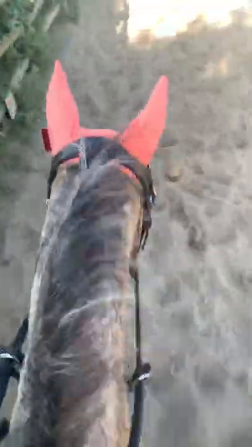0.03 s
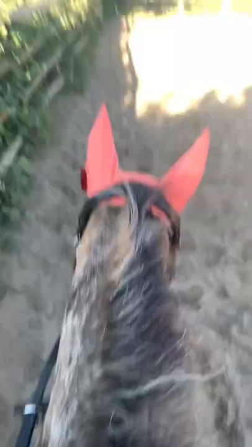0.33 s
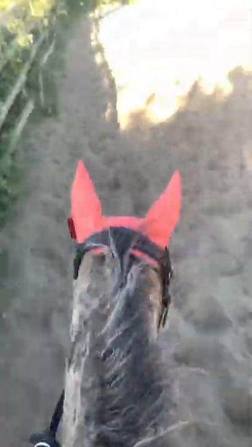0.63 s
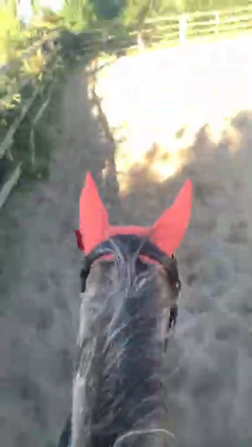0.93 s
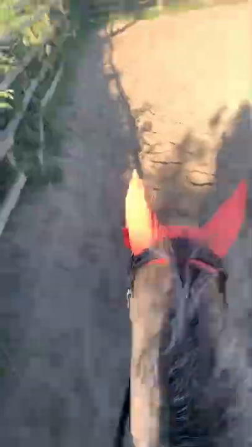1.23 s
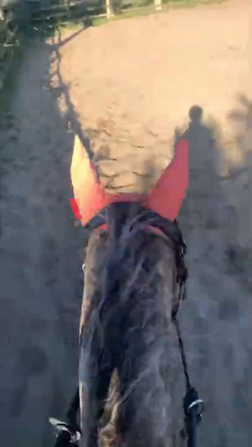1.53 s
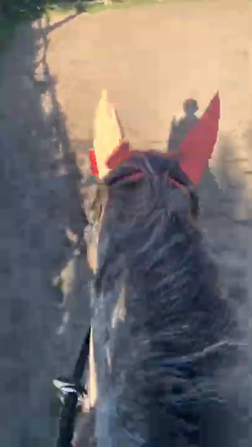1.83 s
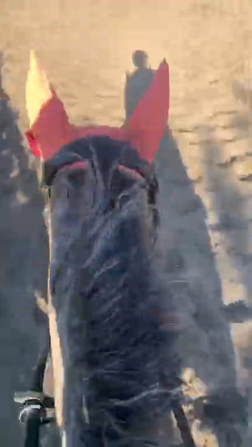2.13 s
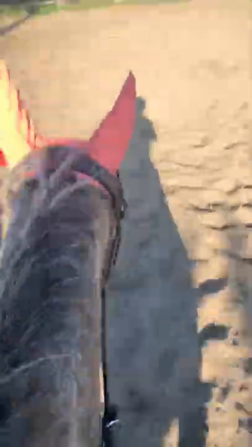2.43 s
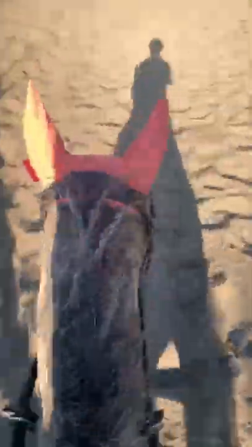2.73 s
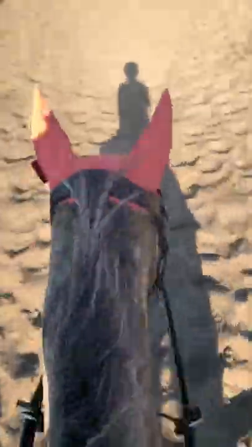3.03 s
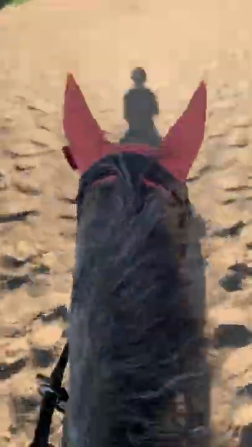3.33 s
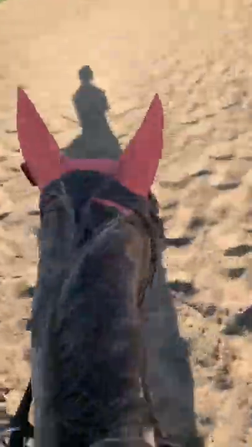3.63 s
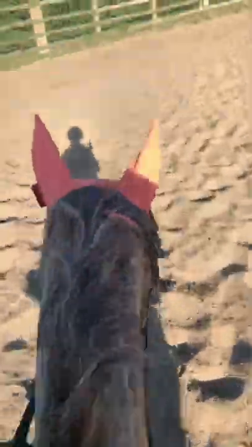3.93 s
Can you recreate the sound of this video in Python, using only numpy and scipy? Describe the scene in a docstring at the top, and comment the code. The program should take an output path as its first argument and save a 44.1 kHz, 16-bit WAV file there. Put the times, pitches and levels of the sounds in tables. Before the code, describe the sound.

Gusts of wind buffet the microphone, heard from the saddle outdoors, over the soft, crunching hoofbeats of a horse trotting on sand. Tack clicks, knocks and squeaks throughout, and a faint bird calls after the strongest gust.

```python
"""A horse trots round a sand arena, heard from the saddle on a camera worn by the rider.
Each hoof beat thuds and crunches in the sand below, and loose sand hisses after it.
Gusts buffet the microphone's two spaced ports; close by, the tack knocks, clicks and squeaks.
Behind it all are the steady rush of open air and a distant bird."""
import sys
import numpy as np
from scipy import signal
from scipy.fft import rfft, irfft
from scipy.io import wavfile
from scipy.ndimage import uniform_filter1d

SR = 44100
rng = np.random.default_rng(int(sys.argv[2]) if len(sys.argv) > 2 else 0)


def wav_out(sig):
    """Save sig, one row per channel (or a flat mono array), as 16-bit PCM at SR to the path in sys.argv[1]."""
    wavfile.write(sys.argv[1], SR, np.round(np.clip(np.atleast_2d(sig).T, -1, 1) * 32767).astype(np.int16))


N = 176400
TIME_S = np.arange(N) / SR
BIN_HZ = np.arange(N // 2 + 1) * SR / N


def undb(db):
    """Decibels to gain."""
    return 10 ** (np.asarray(db) / 20)


def unit(x):
    """Scale to rms 1."""
    return x / np.sqrt(np.mean(x ** 2))


def per_bin(points):
    """A table over log frequency, read at every bin."""
    hz, value = np.array(points).T
    return np.interp(np.log(BIN_HZ + 1), np.log(hz), value)


def colour(x, spectrum):
    """Filter by (freq_hz, gain_db) points, keeping the power of white noise."""
    return irfft(rfft(x) * unit(undb(per_bin(spectrum))), N)


def wander(rate_hz):
    """Smooth random drift with a spread near 1."""
    hold = max(int(SR / rate_hz), 1)
    steps = np.repeat(rng.standard_normal(N // hold + 1), hold)
    return 1.3 * uniform_filter1d(uniform_filter1d(steps, hold), hold)[:N]


def grains(per_s, spread_db):
    """Three rows of tiny random impacts of uneven size."""
    size = undb(spread_db * np.minimum(rng.exponential(size=(3, N)), 4))
    hits = rng.random((3, N)) < per_s / SR
    return unit(hits * size * rng.choice([-1, 1], (3, N)))


def swell(at, half_s):
    """Bell-shaped envelope around a moment."""
    return np.exp(-np.minimum(((TIME_S - at) / half_s) ** 2, 50))


def strike(at, attack_s, decay_s):
    """Envelope that swells up to a moment, then dies away."""
    age = TIME_S - at
    return np.exp(-np.minimum(np.where(age < 0, (age / attack_s) ** 2, age / decay_s), 50))


def whistle(at, hz, glide_hz_per_s, half_s, waver_hz):
    """A brief gliding tone of unsteady pitch."""
    pitch = hz + glide_hz_per_s * (TIME_S - at) + waver_hz * wander(600)
    return swell(at, half_s) * np.sqrt(2) * np.sin(2 * np.pi * np.cumsum(pitch) / SR)


def tap(at, hz, peak_s, fall, rough):
    """A short damped ring whose pitch drops towards hz, with optional grit."""
    age = np.arange(int(10 * peak_s * SR)) / SR
    pitch = hz * (1 + fall * np.exp(-age / peak_s))
    grit = unit(uniform_filter1d(uniform_filter1d(rng.standard_normal(len(age)), 9), 6))
    envelope = age / peak_s * np.exp(1 - age / peak_s)
    ring = (np.sin(2 * np.pi * np.cumsum(pitch) / SR) + rough * grit) * envelope
    return np.pad(ring, (int(at * SR), N))[:N]


def eddies(spectrum, evenness=0.11):
    """Turbulent pressure with its random swells partly evened out."""
    pressure = colour(rng.standard_normal(N), spectrum)
    power = uniform_filter1d(abs(signal.hilbert(pressure)) ** 2, size=900)
    return unit(pressure / power ** (evenness / 2))


# Gusts right on the microphone: centre_s, rumble_db, slap_db, half_length_s
WIND_GUSTS = [(.637,-29,-46,0.022),(0.702,-27.5,-47,0.037),(1.018,-33,-37,0.019),(1.111,-30.5,-39,0.05),(1.338,-31,-39,0.012),(1.633,-31.5,-46.5,0.017),(1.732,-28,-38,0.0069),
              (1.874,-41.5,-74,0.24),(2.127,-31,-45.5,0.063),(2.286,-26.5,-39.5,0.08),(2.443,-31,-61,0.035),(2.579,-34,-46,0.075),(2.799,-35,-41.5,0.032),
              (3.078,-19.5,-29,0.044),(3.198,-23,-32,0.032),(3.271,-25,-34,0.024),(3.365,-30,-31,0.021),(3.446,-32.5,-50,0.1),(3.777,-37,-43.5,0.018)]
# Low buffeting: freq_hz, gain_db
RUMBLE_SPECTRUM = [(20,-58),(32,-17.5),(46,1.5),(62,3),(74,0.5),(115,-5),(160,-15),(220,-24.5),(330,-30.5),(600,-88.5)]
# Small eddies slapping the microphone: freq_hz, gain_db
SLAP_SPECTRUM = [(40,-13),(80,3),(150,19),(300,-7.5),(450,-8.5),(800,-45),(2500,-75)]

def wind(breeze_db=-42):
    """A breeze rumbles on the microphone; gusts add to it and slap with smaller, brighter eddies."""
    gust_power = sum((undb(db) * swell(at, half)) ** 2 for at, db, _, half in WIND_GUSTS)
    rumble = np.sqrt(undb(breeze_db) ** 2 + gust_power)
    slaps = sum(undb(db) * swell(at, half) for at, _, db, half in WIND_GUSTS)
    return rumble * eddies(RUMBLE_SPECTRUM) + slaps * eddies(SLAP_SPECTRUM)


def stride_db(dip_db=3.5, lag_s=0.015):
    """A level that peaks just after each hoof beat and sinks between beats."""
    beats = np.array([row[0] for row in HOOF_BEATS])
    gap = np.min(abs(TIME_S - lag_s - beats[:, None]), axis=0)
    return -dip_db * np.minimum(2 * gap / np.mean(np.diff(beats)), 1) ** 2


# Open air all round the arena: freq_hz, gain_db
AIR_SPECTRUM = [(100,-9),(250,2.5),(450,2.5),(630,-3.5),(850,-2.5),(1200,-9.5),(2000,-14.5),(2800,-23.5),(4300,-24.5),(7000,-42),(16000,-97)]

def open_air(level_db=-45, drift_db=1.0, flicker_db=1.9):
    """A slightly gritty rush whose octaves swell together with the stride and flicker separately."""
    source = rfft(colour(grains(per_s=3500, spread_db=7), AIR_SPECTRUM))
    shared_db = stride_db() + drift_db * wander(15)
    octave = np.log2(np.maximum(BIN_HZ, 125) / 125)
    rush = 0
    for k in range(8):
        band = irfft(source * np.maximum(1 - abs(octave - k), 0), N)
        rush += band * undb(shared_db + flicker_db * wander(27.47))
    return undb(level_db) * unit(rush)


# Cloth near the microphone and loose sand below: centre_s, level_db, half_length_s
RUSTLE_SWISHES = [(0.024,-54.5,0.025),(0.588,-60,0.028),(1.07,-65.5,0.088),(1.277,-67,0.22),(1.873,-57,0.026),(2.107,-59,0.2),(2.737,-63,0.18),(2.961,-53,0.021),(3.434,-61.5,0.047),(3.605,-64,0.12)]
# Their hiss: freq_hz, gain_db
RUSTLE_SPECTRUM = [(1500,7.5),(3000,10.5),(5200,13),(7000,6.5),(9000,1),(12000,5.5),(16000,3)]

def sand_and_cloth(floor_db=-66.5, flicker_db=1.5):
    """Fine sand and cloth rustle throughout, swelling with each swish."""
    strength = undb(floor_db) + sum(undb(db) * swell(at, half) for at, db, half in RUSTLE_SWISHES)
    rustle = grains(per_s=8300, spread_db=1.5) * strength
    return colour(rustle * undb(flicker_db * wander(57)), RUSTLE_SPECTRUM)


# A bird, far off: centre_s, level_db, pitch_hz, glide_hz_per_s, half_length_s
BIRD_NOTES = [(0.061,-66,3287,-1500,0.099),(3.278,-63,3560,-4,0.017),(3.474,-53,4070,19995,0.0078),(3.497,-51,4000,-20000,0.0089),(3.529,-57,3500,35004,0.022),(3.559,-55,3000,-12000,0.013),(3.59,-42,2230,-3000,.028)]

def bird(direct_gain=0.5, echo_decay_s=0.012):
    """A distant bird whistles and twitters, blurred by echoes from the trees."""
    song = sum(undb(db) * whistle(at, hz, glide, half, waver_hz=110)
               for at, db, hz, glide, half in BIRD_NOTES)
    echoes = unit(rng.standard_normal((2, N)) * np.exp(-TIME_S / echo_decay_s)) / np.sqrt(N)
    return direct_gain * song + signal.fftconvolve(song[None], echoes, axes=1)[:, :N]


# Tack squeaking within arm's reach: centre_s, tone_db, rub_db
TACK_SQUEAKS = [(.06,-59,-58),(.78,-51,-53),(1.503,-50,-49),(1.865,-49,-47),(3.36,-57,-47),(3.50,-60,-51),(3.70,-55,-50)]
# The scrape round each squeak: freq_hz, gain_db
RUB_SPECTRUM = [(1500,18),(3000,15),(4200,15.5),(5500,9.5),(8000,-3.5),(16000,-3.5)]

def tack_squeaks():
    """A fitting gives a thin, falling squeak inside a scrape of rubbing."""
    rubbing = sum(undb(db) * strike(at, attack_s=0.044, decay_s=0.044) for at, _, db in TACK_SQUEAKS)
    sound = colour(rubbing * grains(per_s=2300, spread_db=6), RUB_SPECTRUM)
    for at, db, _ in TACK_SQUEAKS:
        sound[0] += undb(db) * whistle(at, hz=5270, glide_hz_per_s=-6000, half_s=0.017, waver_hz=130)
    return sound


# Dull knocks of leather and thrown clods, close by: start_s, peak_db, final_pitch_hz
DULL_KNOCKS = [(.170,-36,910),(.192,-36,1330),(.237,-38,900),(.297,-33,770),(.572,-46,1740),(0.599,-39,1910),(1.025,-36,785),(1.121,-37,1970),(1.505,-32,665),
               (1.649,-30,1000),(1.782,-37.5,995),(1.818,-45,1270),(2.291,-32.5,800),(2.375,-34,970),(2.393,-35.5,1530),(2.466,-36,860),(2.507,-36,810),(2.568,-43,1190),(3.108,-35,830),
               (3.129,-39,850),(3.163,-33,840),(3.186,-33,716),(3.232,-35,880),(3.246,-34,1300),(3.30,-39,1430),(3.687,-37,1690),(3.932,-34,720)]
# Saddle leather creaking under the rider: start_s, length_s, peak_db
SADDLE_CREAKS = [(0.919,.05,-41),(1.601,.055,-43.5),(2.401,.06,-40.5),(3.105,.045,-50)]

def leather_and_clods(slips_per_s=120, slip_hz=1200, scatter_db=1.2, detune_octaves=0.1):
    """Lone knocks and creaking runs of slips, each scattered in level and pitch at either port."""
    slips = [(at + (k + 0.1 * rng.standard_normal()) / slips_per_s, db, slip_hz)
             for at, length, db in SADDLE_CREAKS for k in range(int(length * slips_per_s))]
    sides = np.zeros((2, N))
    for side in sides:
        for at, db, hz in DULL_KNOCKS + slips:
            gain = undb(db + scatter_db * rng.standard_normal())
            pitch = hz * 2 ** rng.normal(0, detune_octaves)
            side += gain * tap(at, pitch, peak_s=0.0011, fall=1.2, rough=0.25)
    return sides


def crumble(strength, per_s=300, spread_db=3.6, decay_cycles=3):
    """Crumbs of packed sand break: each rings for a few cycles at its own pitch."""
    age = np.arange(700) / SR
    crumbs = np.zeros(N + len(age))
    for when, pitch, chance in rng.random((int(per_s * N / SR), 3)):
        start, hz = int(when * N), 500 * 2 ** (2.5 * pitch)
        gain = strength[start] * undb(spread_db * min(-np.log(chance), 4)) * hz
        ring = np.sin(2 * np.pi * hz * age) * np.exp(-age * hz / decay_cycles)
        crumbs[start:start + len(age)] += gain * ring
    return unit(crumbs[:N]) * np.sqrt(np.mean(strength ** 2))


# Hooves landing below the rider: peak_s, relative_thud_db, relative_crunch_db, decay_s
HOOF_BEATS = [(.19,-38.5,-43,0.075),(0.569,-51,-56,0.15),(0.936,-43.5,-46.5,0.071),(1.307,-63,-44,0.041),(1.659,-38,-37.5,0.026),(2.018,-45,-41.5,0.014),
              (2.39,-43.5,-47.5,0.089),(2.762,-57,-56,0.27),(3.131,-48,-36.5,0.038),(3.481,-58.5,-45,0.071),(3.86,-39.5,-41.5,0.045)]
# The thud in the arena floor: freq_hz, gain_db
THUD_SPECTRUM = [(100,-24),(200,-11),(300,-9),(430,-5),(600,-10),(1000,-14),(3000,-52)]
# Sand scuffing and breaking: freq_hz, gain_db
CRUNCH_SPECTRUM = [(250,1.5),(550,-9.5),(850,6),(1200,-2),(1900,-5),(2700,-14),(4200,-20),(8000,-34),(16000,-21)]

def hooves(attack_s=0.018, thud_gain_db=2, scuff_gain_db=-3, crumb_db=-49):
    """Each beat is a soft thud, a scuff of fine sand and a crunch of breaking crumbs."""
    weight = sum(undb(db) * strike(at, attack_s, decay) for at, db, _, decay in HOOF_BEATS)
    crunch = sum(undb(db) * strike(at, attack_s, decay) for at, _, db, decay in HOOF_BEATS)
    trickle = undb(-48.5)  # crumbs keep breaking between beats
    crumbs = colour(np.array([crumble(crunch + trickle) for _ in range(3)]), CRUNCH_SPECTRUM)
    scuff = colour(crunch * grains(per_s=1700, spread_db=-3.5), CRUNCH_SPECTRUM)
    thud = colour(weight * rng.standard_normal((3, N)), THUD_SPECTRUM)
    return undb(thud_gain_db) * thud + undb(scuff_gain_db) * scuff + undb(crumb_db) * unit(crumbs)


# Buckles and rings near the microphone: time_s, tick_db, rattle_db
BUCKLE_CLICKS = [(.382,-30,-46),(.420,-29,-42),(.736,-29,-43),(.757,-29,-43),(1.123,-44,-46),(1.323,-37,-41),(1.3647,-22,-30),
                 (2.0935,-20,-47),(2.47,-37,-54),(2.6237,-30,-52),(2.962,-40,-42),(3.9623,-19,-38)]
# Their bright metal: freq_hz, gain_db
BUCKLE_SPECTRUM = [(1200,1),(2800,8),(6000,11.5),(9000,3.5),(12000,1),(16000,2)]

def buckles():
    """Metal fittings meet in one sharp tick, then rattle for a few milliseconds."""
    rattle = sum(undb(db) * strike(at, attack_s=0.001, decay_s=0.006) for at, _, db in BUCKLE_CLICKS)
    impacts = rattle * grains(per_s=4400, spread_db=1)
    for at, db, _ in BUCKLE_CLICKS:
        impacts[0, int(at * SR)] += undb(db)
    return colour(impacts, BUCKLE_SPECTRUM)


# Single eddies right on the microphone: start_s, peak_db, final_pitch_hz
EDDY_THUMPS = [(.44,-28.5,133.6),(0.629,-26,100),(2.289,-26,130),(3.068,-21,105.5),(3.191,-24,70),(3.268,-26,133.7)]

def wind_thumps():
    """Each eddy bursts on the microphone as a low thump of falling pitch."""
    return sum(undb(db) * tap(at, hz, peak_s=0.005, fall=3, rough=0) for at, db, hz in EDDY_THUMPS)


# How alike the two microphone ports sound: freq_hz, shared_power_fraction
PORT_LIKENESS = [(420,1),(560,0.067),(900,0.18),(1600,0.64),(3000,0.34),(4300,0.99)]
# Phase by which the left side leads the right, thinning their sum at some frequencies: freq_hz, lead_rad
SIDE_PHASE = [(20,0),(450,0),(700,-2.9),(1120,-2.2),(1550,.3),(4050,2.2),(6900,6.28),(11100,12.57),(16500,20.4)]

def microphone_ports(rows):
    """Three rows (shared, left only, right only) turned into left and right, the shared part shifted in phase
    between the sides."""
    likeness = np.clip(per_bin(PORT_LIKENESS), 0, 1)
    lead = np.interp(BIN_HZ, *np.array(SIDE_PHASE).T)
    spectra = rfft(rows)
    shared = np.sqrt(likeness) * spectra[0] * np.exp(1j * np.outer([1, 0], lead))
    return irfft(shared + np.sqrt(1 - likeness) * spectra[1:], N)


def scene():
    """From the saddle: wind is the same on both sides; horse and arena reach the ports apart."""
    mix = wind() + wind_thumps() + bird() + leather_and_clods()
    return mix + microphone_ports(hooves() + buckles() + tack_squeaks() + sand_and_cloth() + open_air())


def record(dry):
    """The rider's camera cuts the top treble steeply."""
    cutoff_hz = 15900
    return signal.sosfilt(signal.ellip(10, 0.2, 70, cutoff_hz, fs=SR, output="sos"), dry)


dry = scene()
out = record(dry)
wav_out(out)
```